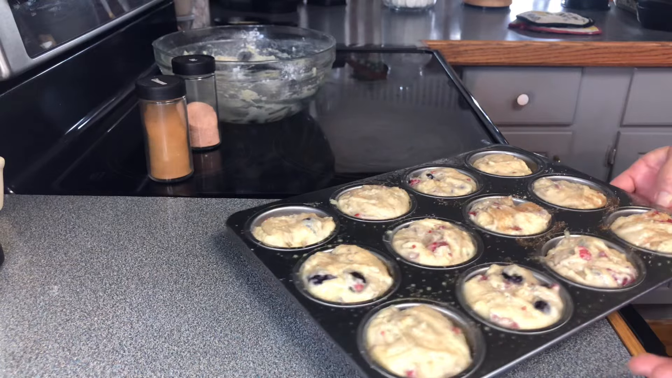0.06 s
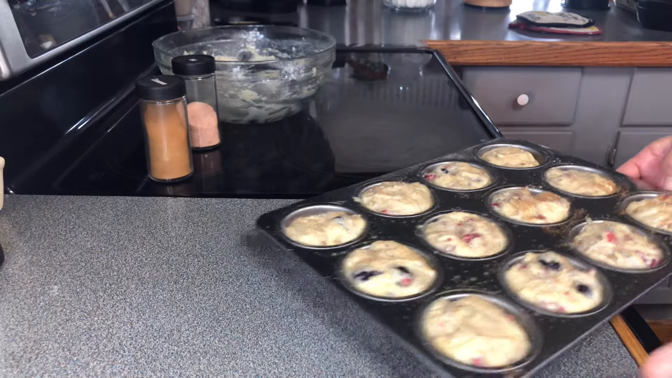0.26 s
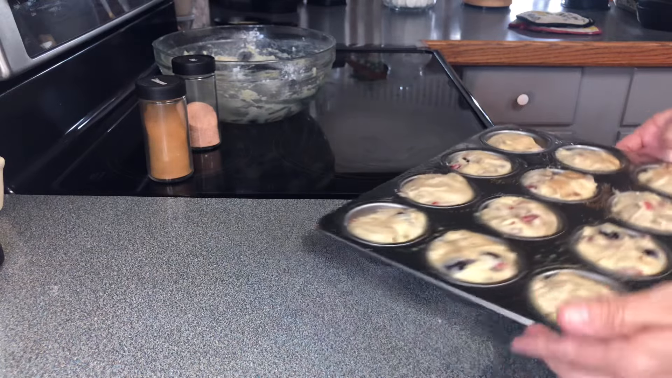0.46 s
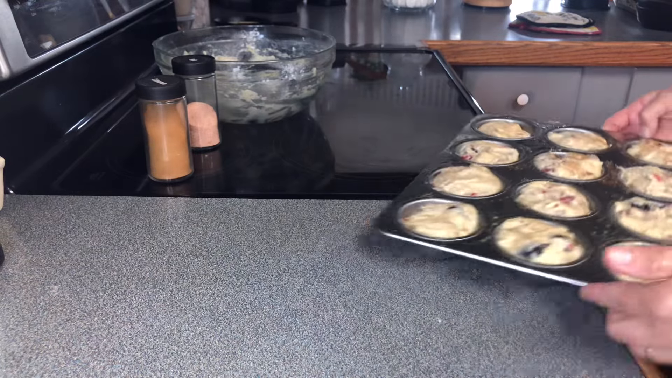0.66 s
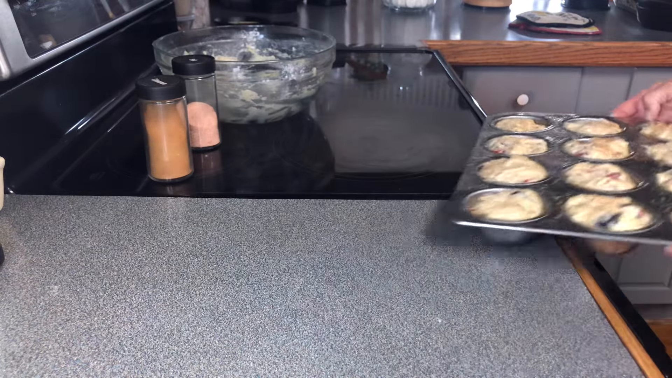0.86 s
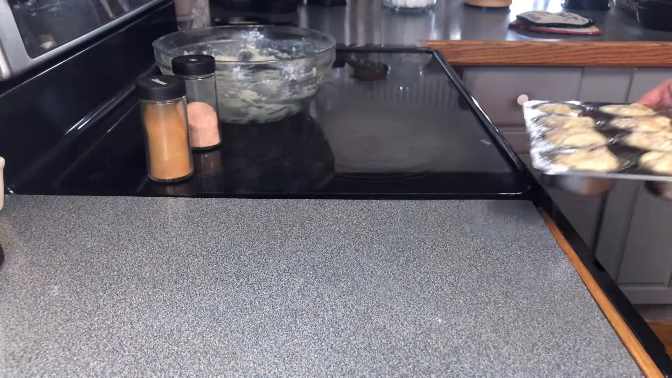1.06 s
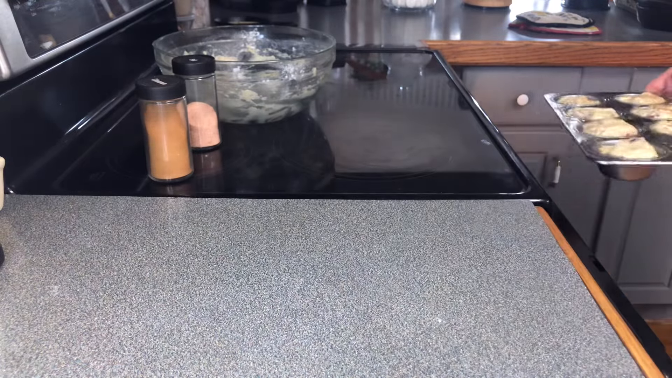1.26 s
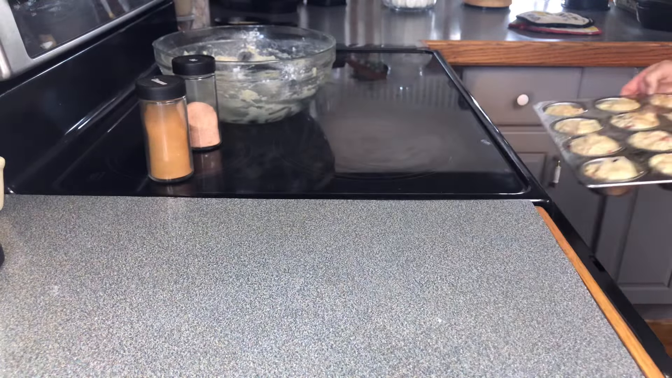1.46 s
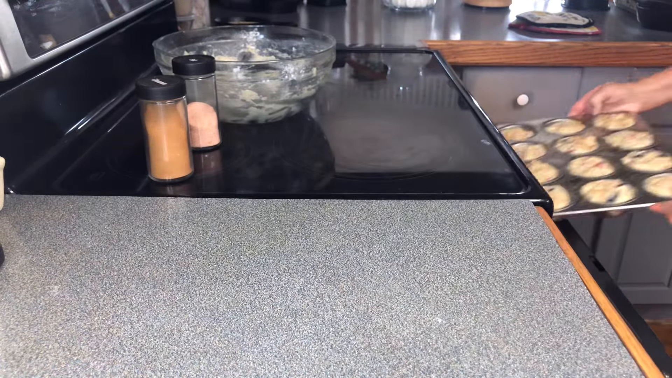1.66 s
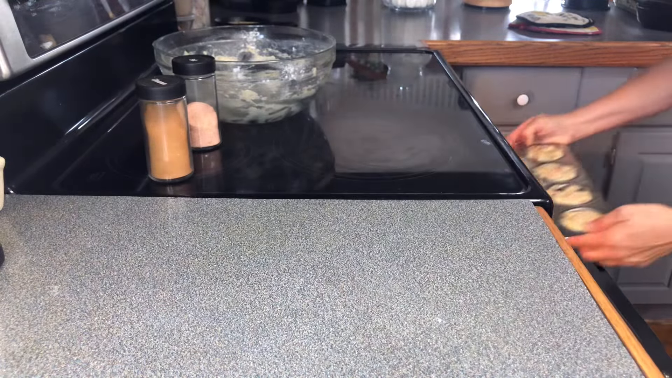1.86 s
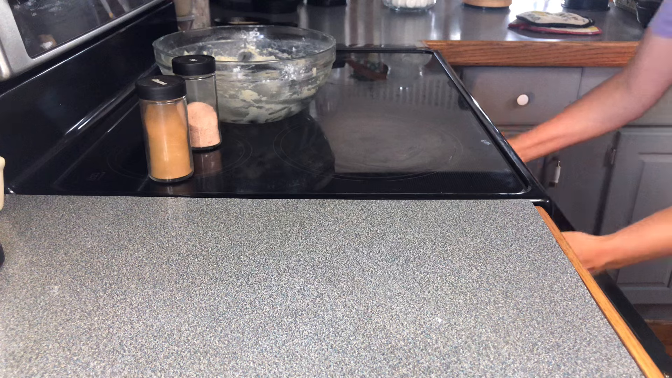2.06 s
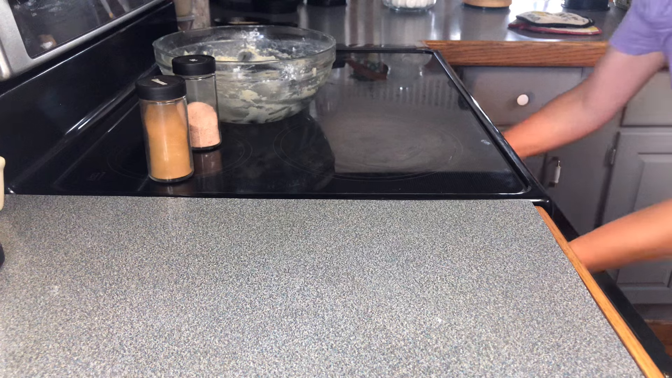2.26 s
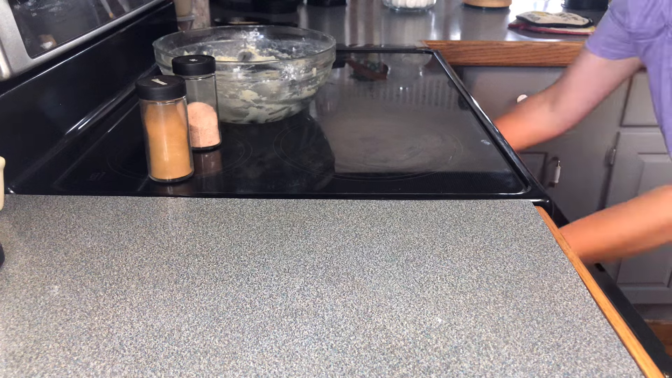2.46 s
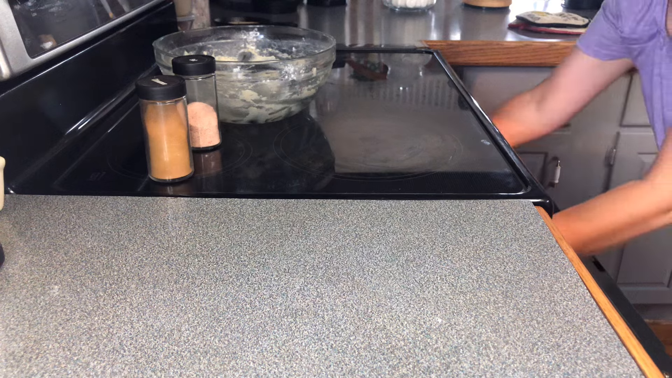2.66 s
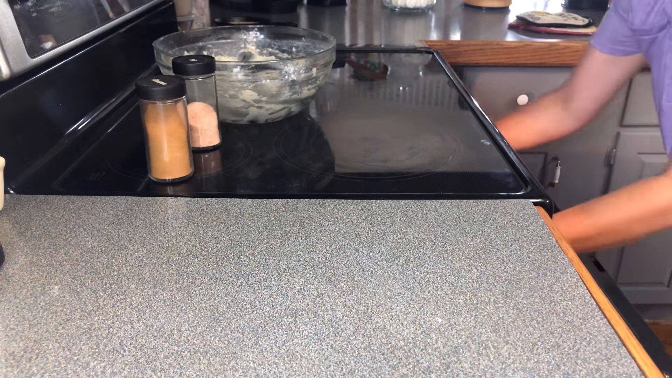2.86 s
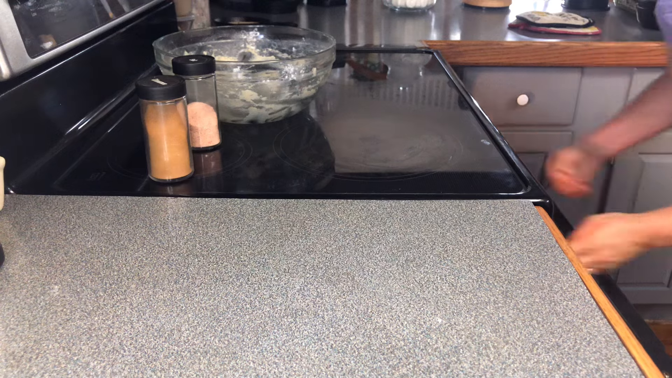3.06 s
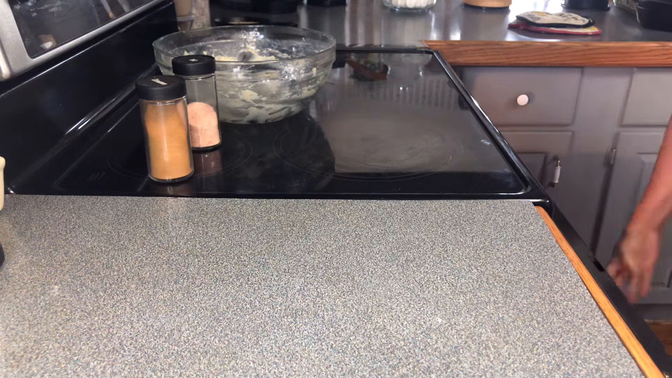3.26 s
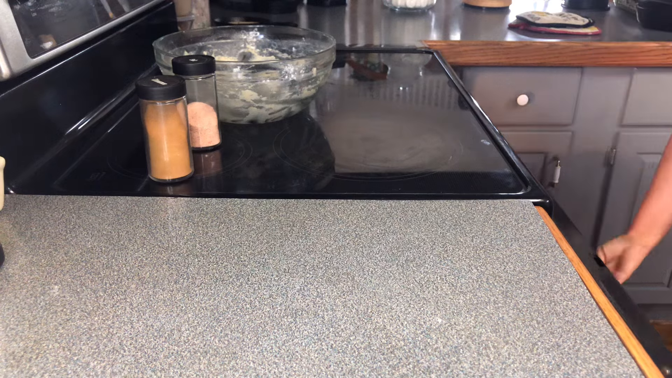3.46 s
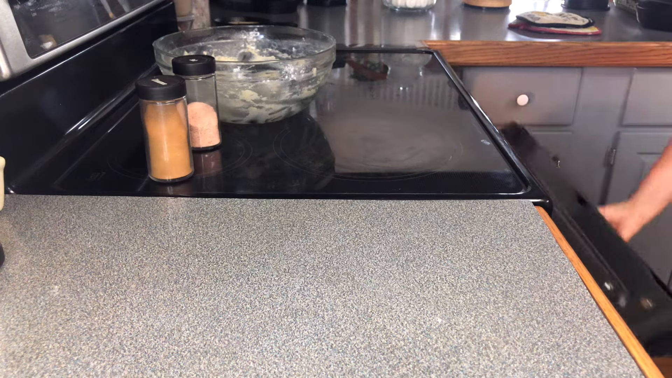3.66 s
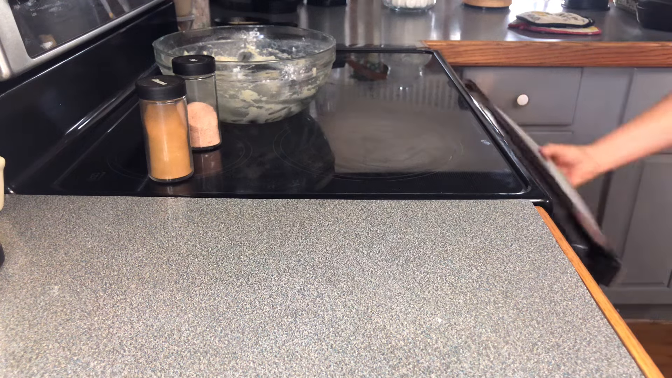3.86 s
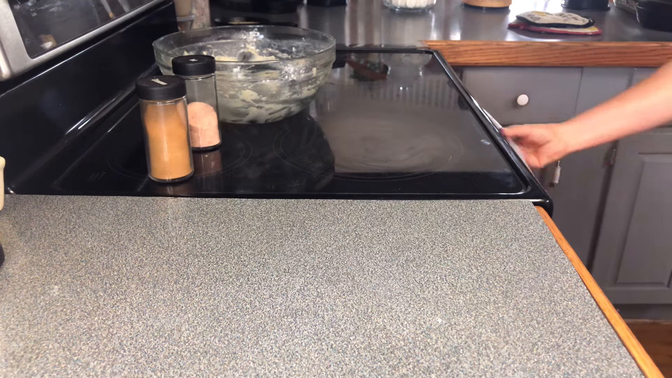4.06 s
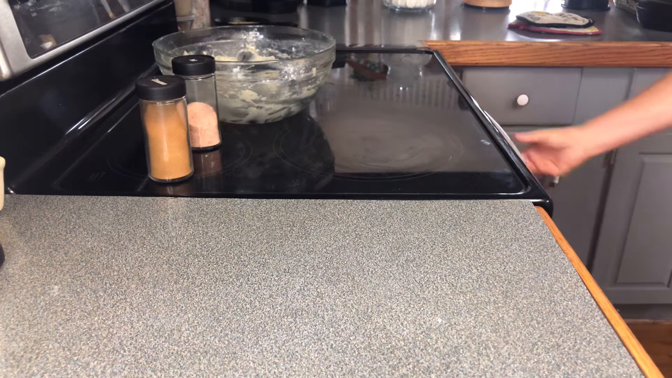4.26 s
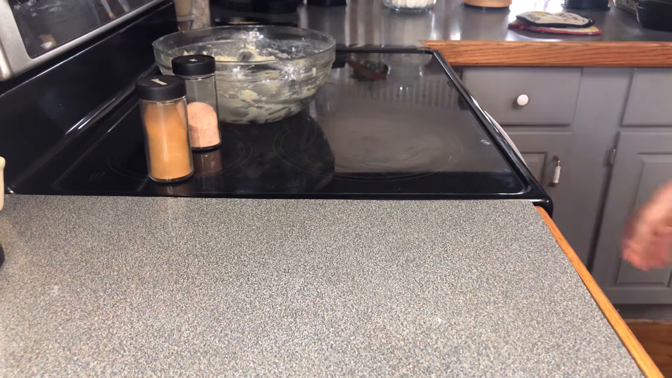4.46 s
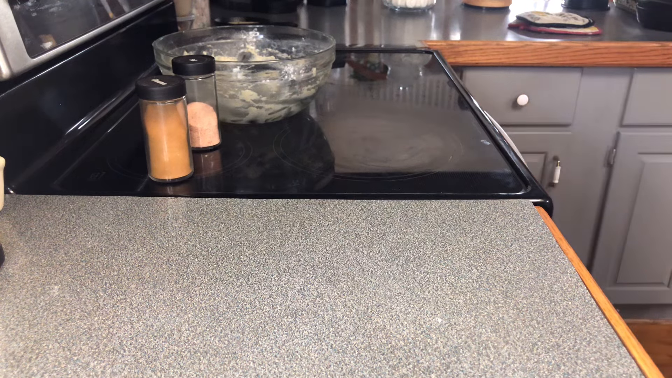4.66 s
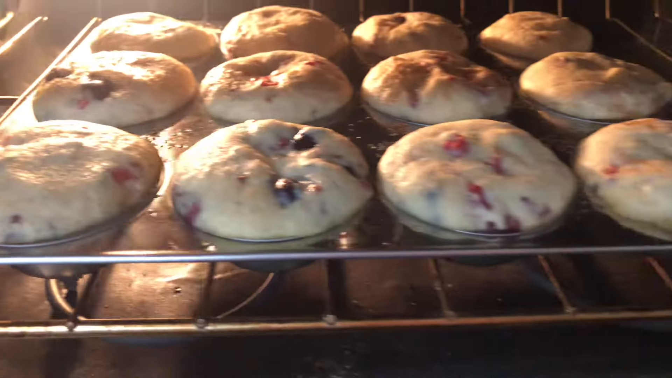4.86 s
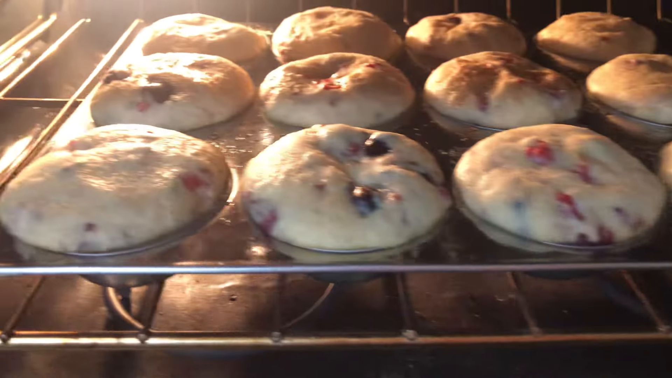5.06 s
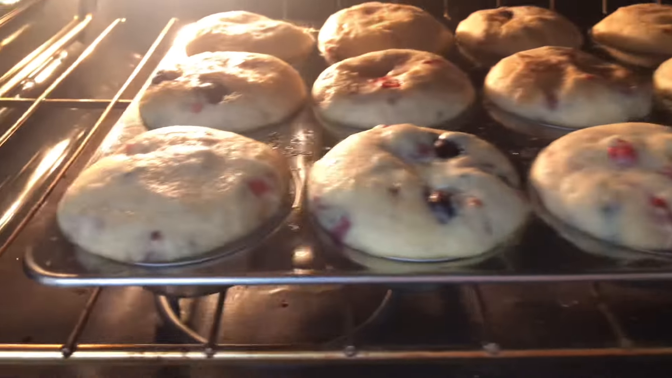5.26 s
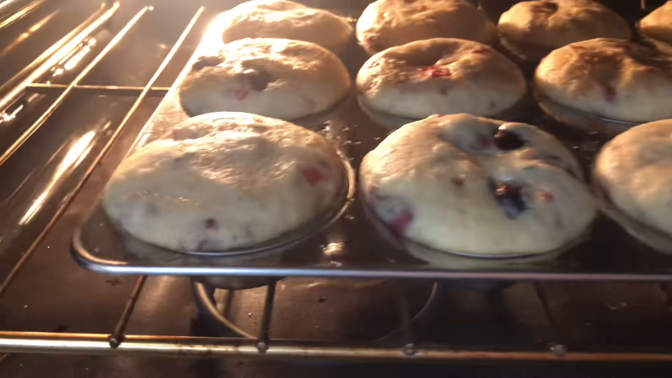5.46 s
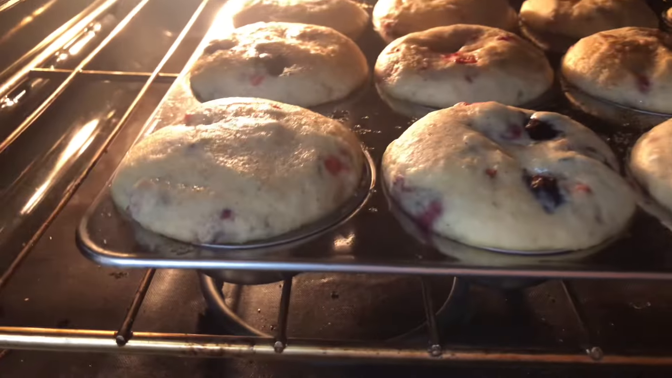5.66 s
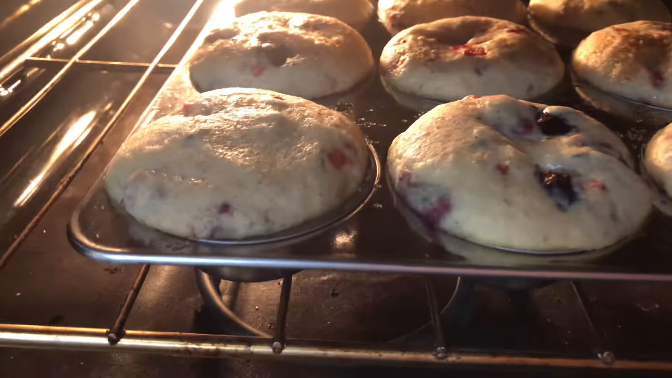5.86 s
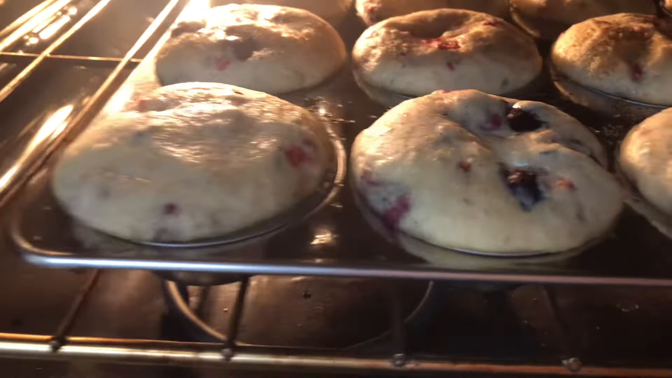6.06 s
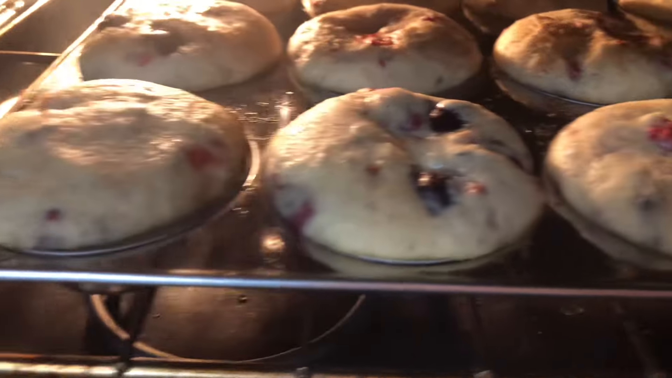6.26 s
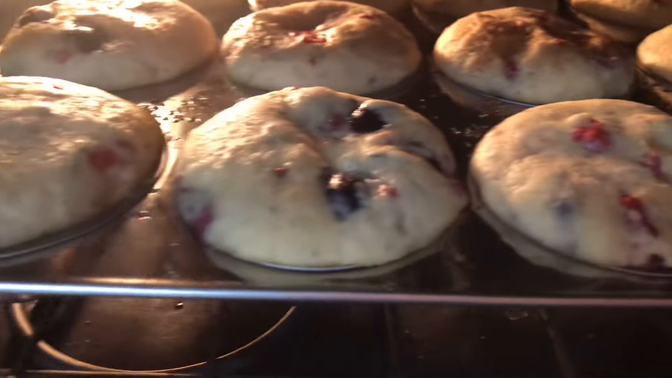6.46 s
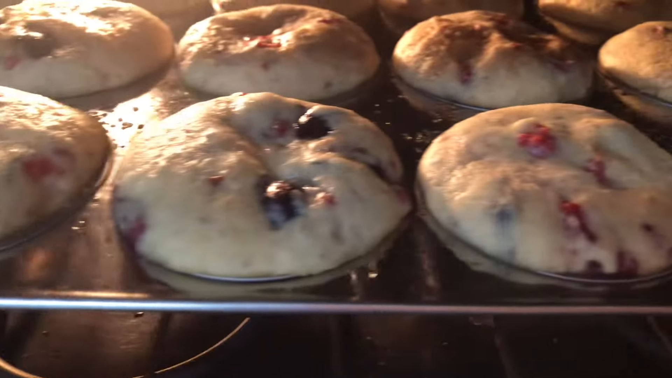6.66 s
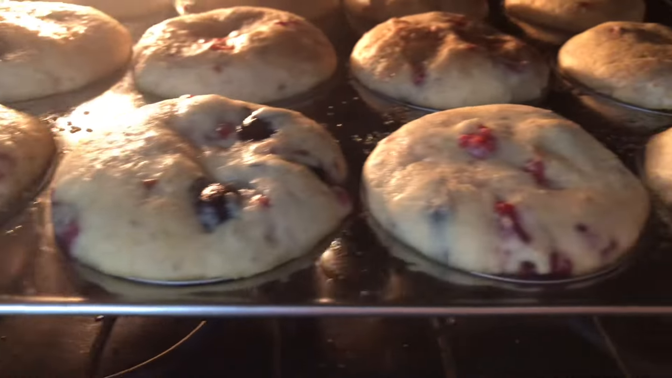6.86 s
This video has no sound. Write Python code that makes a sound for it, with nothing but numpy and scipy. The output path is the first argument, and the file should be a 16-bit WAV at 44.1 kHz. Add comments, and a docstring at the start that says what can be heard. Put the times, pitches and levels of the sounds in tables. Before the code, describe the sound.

A quiet kitchen with low airy hum, heard by a small nearby microphone. From 0 s a full metal muffin tin drags over a textured counter, its scrape gritty and hollow, growing until about 0.5 s with small catches and judders, then easing. At 0.83 s its edge gives a sharp bright knock as it lifts off. From 1.1 to 2 s clothing brushes very softly. At 2.16 s the tin lands on a wire oven rack and slides with a loud clanging chatter, hitting again at 2.44 s; a small tap follows at 2.64 s while wires ring thinly. A dull faint bump comes at 3.37 s. At 3.86 s the door hinge clacks hard; around 4.07-4.2 s the door rattles home with a low thump and a tick. Fabric rustles near 4.65 s. At 4.87 s the background switches abruptly to a close, low oven hum with sparse faint spits until the end.

```python
"""A full muffin tin is dragged off a kitchen counter, knocks its edge and is slid, chattering, onto a wire
oven rack; the oven door clacks on its hinge and shuts with a rattle and a thump. Clothing brushes softly.
Then, close to the hot oven, it hums and the baking muffins tick faintly.
Contacts are forces of noise grains and bursts convolved with the modal answers of metal bodies;
cloth and air are coloured noise, and the hums are wavering sines."""
import sys
import numpy as np
from scipy import signal
from scipy.io import wavfile

SR = 44100
rng = np.random.default_rng(int(sys.argv[2]) if len(sys.argv) > 2 else 0)


def to_wav(s):
    """Save 16-bit WAV."""
    ch = np.atleast_2d(s).T  # columns
    pcm = np.round(np.clip(ch, -1, 1) * 32767)  # PCM
    wavfile.write(sys.argv[1], SR, pcm.astype(np.int16))


N = 304751
T = np.arange(N) / SR
RING_T = T[:2 * SR]
AT_OVEN_S = 4.87
CUTOFF_HZ = 15900

# In all tables dB is a relative level, before a body or a mix weighs it, unless a comment says otherwise.
# Skids where the cups bite harder. Each row: start in seconds, level in dB, hold in seconds, release in dB per s.
CUP_SKIDS = [(0.078, -47, 0.018, 300), (0.398, -44, 0.013, 600), (0.446, -42.5, 0.016, 500),
             (0.75, -50, 0.015, 400)]
# Catches on grit. Each row: start in seconds, level in dB, decay time of the rebounds in seconds,
# contact softness as a cut-off in Hz.
CATCHES_ON_GRIT = [(0.002, -48, 0.014, 14000), (0.083, -32.5, 0.0018, 15400), (0.482, -42, 0.013, 14000),
                   (0.51, -46, 0.03, 5000), (0.602, -45, 0.0063, 12000), (0.634, -46, 0.024, 14000),
                   (0.688, -45, 0.012, 14000)]
# Knocks of the tin. Each row: start in seconds, level in dB, rebound decay in seconds, softness cut-off in Hz.
EDGE_KNOCKS = [(0.001, -45, 0.0048, 2000), (0.8316, -4, 0.000083, 12000), (0.8392, -31.5, 0.0034, 9000),
               (0.876, -42.5, 0.022, 15000)]
# Clear modes of the tin. Each row: frequency in Hz, level in dB (of its energy), t60 in seconds.
TIN_MODES = [(148, -4, 0.3), (210, -10, 0.11), (355, -13.5, 0.1), (580.7, 1, 0.37), (744, 0, 0.89),
             (760, -4.5, 0.29), (1107, -10.5, 0.35), (1362, -20, 0.1), (1720, -1.5, 0.14),
             (1825, -21, 0.25), (2036, -10, 0.057), (2196, -13, 0.18), (2360, -4, 0.027), (2570, -44, 0.19)]
# Decay of the tin's crowded modes. Each row: frequency in Hz, t60 in seconds.
TIN_WASH_DECAY = [(150, 0.21), (700, 0.37), (2500, 0.39), (12000, 0.31)]
# Spectrum of the rubbing cups. Each row: frequency in Hz, density in dB per Hz.
RUBBING_SPECTRUM = [(120, -10.5), (210, 1), (300, -12.5), (420, -3), (600, 2), (1100, 0), (1450, -7.5),
                    (1750, -1.5), (2400, -7.5), (3600, -12.5), (6000, -22), (9000, -44), (15000, -42)]
# Spectrum of scratching grit. Each row: frequency in Hz, density in dB per Hz.
GRIT_SPECTRUM = [(700, 12.5), (1500, 5), (3500, 7.5), (6000, 2.5), (8500, -1), (11000, -2), (15500, -4.5)]
# Spectrum of the knocks. Each row: frequency in Hz, density in dB per Hz.
KNOCK_SPECTRUM = [(140, -0.5), (190, -2), (360, -12.5), (620, 2.5), (850, -3), (1120, -11), (1400, -5.5),
                  (1750, -7.5), (2350, -6), (3300, -14), (5000, -23), (7700, -26), (11000, -36),
                  (15500, -39)]


def tin_on_counter():
    """Friction noise: the cups rub over the textured counter, catch on grit and knock its edge."""
    rub = pull(peak_s=0.468, peak_db=-39.0, build_db_per_s=26, drop_db=8.5, fade_db_per_s=4)
    rub = rub + sum(chatter(*skid) for skid in CUP_SKIDS)
    hiss = pull(peak_s=0.535, peak_db=-47.0, build_db_per_s=22, drop_db=7.5, fade_db_per_s=26)
    scuffs = amp(1.5 * drift(130))  # the cups grip and slip unevenly
    rubbing = sliding(rub * scuffs * grains(2000, 2.6), shifts_per_s=13.83,
                      colour=RUBBING_SPECTRUM, decay=TIN_WASH_DECAY, modes=TIN_MODES,
                      crack_t60=0.034, tail_db=-5, modes_db=-6, snap=0.97)
    grit = hiss * scuffs * grains(6000, 2.3) + blows(CATCHES_ON_GRIT, first_touch=0.35)
    scratching = play(grit, metal(GRIT_SPECTRUM, TIN_WASH_DECAY, TIN_MODES,
                                  crack_t60=0.026, tail_db=4, modes_db=-14.5, snap=1.8))
    knocks = play(blows(EDGE_KNOCKS, first_touch=2.5),
                  metal(KNOCK_SPECTRUM, TIN_WASH_DECAY, TIN_MODES,
                        crack_t60=0.018, tail_db=-1.5, modes_db=-26, snap=0.49))
    return amp(-4) * rubbing + scratching + knocks


# Judders where the cups stick. Each row: start in seconds, level in dB, rebound decay in seconds,
# softness cut-off in Hz.
STICKING_JUDDERS = [(0.462, -38.5, 0.03, 2000), (0.6, -42, 0.021, 1000), (0.624, -37.5, 0.014, 1000),
                    (0.777, -49.5, 0.035, 1500), (2.442, -30, 0.02, 2000)]
# Modes of the cups. Each row: frequency in Hz, level in dB (of its energy), t60 in seconds.
CUP_MODES = [(340, -4.5, 0.13), (396, -8.5, .15), (462, -7, 0.055), (505, -4.5, 0.14), (594, -7, 0.24)]
# Dull bumps that flex the tin. Each row: start in seconds, level in dB, contact time in seconds.
FLEXING_BUMPS = [(0.008, -40, 0.003), (0.39, -35.5, 0.0014), (0.625, -39, 0.0019), (0.835, -27.5, 0.0029),
                 (2.17, -28, 0.0016), (2.27, -28.5, 0.0019), (2.305, -30, 0.0014), (3.368, -37.5, 0.0036)]


def tin_flexing():
    """Modal excitation: the cups judder where they stick, and the whole sheet flexes when bumped."""
    judders = play(blows(STICKING_JUDDERS, first_touch=0.29), ringing(CUP_MODES))
    return amp(-10.5) * judders + bumps(FLEXING_BUMPS, TIN_MODES)


# Shoves along the wires. Each row: start in seconds, level in dB, hold in seconds, release in dB per s.
RACK_SHOVES = [(2.166, -30.5, 0.016, 300), (2.216, -29.8, 0.1, 700), (2.43, -48.5, 0.07, 170)]
# Hits on the rack. Each row: start in seconds, level in dB, rebound decay in seconds, softness cut-off in Hz.
HITS_ON_RACK = [(2.1605, -32, .005, 15100), (2.171, -29.5, 0.0086, 9000), (2.226, -28, .016, 14000),
                (2.26, -18, 0.012, 14400), (2.4405, -27, 0.02, 6660), (2.637, -47, 0.022, 2160)]
# Clear modes of the rack. Each row: frequency in Hz, level in dB (of its energy), t60 in seconds.
RACK_MODES = [(190, 4.5, 0.85), (238, -0.5, 0.9), (275, -10.5, 0.96), (498, -28, 0.41), (930, 4, 0.59),
              (1054, -9, 0.93), (1060, -7, 1), (1152, -8.5, .5), (1344, -6.5, 1), (1667, 3.5, .6),
              (1890, 3, .4), (2320, -8, 0.23), (2420, -10, 0.39), (2780, -15, .4), (2870, -8, 0.69),
              (3668, -7, 0.37), (3890, -13.5, 0.13), (4000, -25, .4)]
# Decay of the rack's crowded modes. Each row: frequency in Hz, t60 in seconds.
RACK_WASH_DECAY = [(150, 1), (600, 0.91), (2000, 0.54), (5000, .42), (12000, 0.33)]
# Spectrum of tin against rack. Each row: frequency in Hz, density in dB per Hz.
RACK_SPECTRUM = [(125, -5.5), (160, 1.5), (240, -2.5), (350, -16), (560, -9), (750, -10.5), (950, -6),
                 (1400, -10.5), (2400, -9.5), (4000, -14.5), (5500, -17.5), (8000, -21), (11500, -28),
                 (15500, -33)]


def tin_on_rack():
    """Coupled bodies: the tin lands, judders along the wires and hits the stop; rack and tin ring on."""
    push = sum(chatter(*shove) for shove in RACK_SHOVES)
    force = push * grains(700, 4.2) + blows(HITS_ON_RACK, first_touch=0.41)
    return sliding(force, shifts_per_s=25,
                   colour=RACK_SPECTRUM, decay=RACK_WASH_DECAY, modes=RACK_MODES + TIN_MODES,
                   crack_t60=0.035, tail_db=5, modes_db=-9)


# Plucks of the rack wires. Each row: start in seconds, level in dB.
PLUCKS = [(2.441, -47), (2.637, -49)]
# Modes of the wires. Each row: frequency in Hz, level in dB (of its amplitude), t60 in seconds.
WIRE_MODES = [(302, -4, 2.6), (316, -7, 2.26), (337, -7, 3), (383, -3, 0.92), (717.7, -7, 2.6),
              (883, -12.5, 1.8), (1320, -19, 1.8), (1730, -10, .9), (1760, -13, 2.8), (1763.5, -15, 2.8),
              (1784, -15, 2), (2300, -16, 0.92), (2950, -11, 1)]


def wires():
    """Beating: once the tin settles, the free rack wires sing on, some in close pairs."""
    force = np.zeros(N)
    for s, db in PLUCKS:
        force[round(s * SR)] = amp(db)
    answer = 0
    for hz, db, t60 in WIRE_MODES:
        phase = rng.uniform(0, 2 * np.pi)
        answer = answer + amp(db) * dying(t60) * np.sin(2 * np.pi * hz * RING_T + phase)
    return amp(-4.0) * play(force, answer)


# Clacks of the hinge. Each row: start in seconds, level in dB, rebound decay in seconds, softness cut-off in Hz.
CLACKS = [(3.8545, -28.5, 0.003, 15000), (3.859, -22, 0.0042, 14000)]
# Hits of the closing door. Each row: start in seconds, level in dB, rebound decay in seconds,
# softness cut-off in Hz.
CLOSING_HITS = [(4.072, -36, 0.013, 14000), (4.079, -33, 0.019, 8000), (4.117, -37, 0.012, 3500)]
# Ticks of the small latch. Each row: start in seconds, level in dB, rebound decay in seconds,
# softness cut-off in Hz.
SMALL_LATCH_TICKS = [(4.186, -32.5, 0.012, 15000)]
# Rattle of the door's panels. Its one row: start in seconds, level in dB, hold in seconds, release in dB per s.
RATTLE_OF_PANELS = (4.102, -40.5, 0.03, 98)
# Door against the oven shell. Each row: start in seconds, level in dB, contact time in seconds.
THUMPS_ON_SHELL = [(3.866, -42, .002), (4.106, -26.5, 0.0035)]
# Clear modes of the door. Each row: frequency in Hz, level in dB (of its energy), t60 in seconds.
DOOR_MODES = [(114, -11, 0.67), (413, -17, 0.13), (420, -3.5, 0.2), (467, -8, .2), (613, -2, 0.28),
              (730, -1.5, 0.4), (1292, -5.5, 0.21), (1647, -5, 0.4), (2710, -10, 0.17), (3210, -2.5, 0.12),
              (3190, -3, 0.24), (4387, -2.5, 0.047), (4550, -10, 0.069)]
# Low modes of the shell. Each row: frequency in Hz, level in dB (of its energy), t60 in seconds.
SHELL_MODES = [(40.5, -12, .12), (55, 2, 0.54), (83.4, -3.5, 0.11), (117.6, 2.5, 0.23), (168.4, 1.5, 0.27),
               (195.5, -7, 0.36)]
# Decay of the door's crowded modes. Each row: frequency in Hz, t60 in seconds.
DOOR_WASH_DECAY = [(150, 0.27), (700, 0.47), (2500, 0.4), (6000, 0.42), (12000, 0.24)]
# Spectrum of the hinge. Each row: frequency in Hz, density in dB per Hz.
HINGE_SPECTRUM = [(110, -0.5), (190, -1.5), (290, -6), (420, 6), (590, -8), (800, -5), (1100, -11.5),
                  (1600, -7), (2100, -13), (3300, -7.5), (4700, -12), (6000, -18.5), (10000, -19.5),
                  (15500, -26)]
# Spectrum of the door. Each row: frequency in Hz, density in dB per Hz.
DOOR_SPECTRUM = [(130, -5.5), (210, -5), (320, -15.5), (480, -5), (650, -11.5), (900, -16), (1450, -15),
                 (2100, -16), (3700, -23.5), (5200, -21.5), (9000, -26), (15500, -27.5)]


def oven_door():
    """Impact: the hinge snaps over its catch, then the door rattles home and thumps the shell."""
    hinge = sliding(blows(CLACKS, first_touch=0.5), shifts_per_s=150,
                    colour=HINGE_SPECTRUM, decay=DOOR_WASH_DECAY, modes=DOOR_MODES,
                    crack_t60=0.033, tail_db=0, modes_db=-11, snap=0.2)
    panels = soften(chatter(*RATTLE_OF_PANELS) * grains(900, 3.0), soft_hz=2700)
    small_latch = signal.butter(2, 7000, "high", fs=SR, output="sos")  # it rings only in the highs
    latch = signal.sosfilt(small_latch, blows(SMALL_LATCH_TICKS, first_touch=0.24))
    hits = blows(CLOSING_HITS, first_touch=0.24)
    rattle = sliding(hits + panels + latch, shifts_per_s=30,
                     colour=DOOR_SPECTRUM, decay=DOOR_WASH_DECAY, modes=DOOR_MODES,
                     crack_t60=0.022, tail_db=7, modes_db=-11, snap=0.46)
    return hinge + rattle + bumps(THUMPS_ON_SHELL, SHELL_MODES)


# Spits of batter on the hot tin. Each row: start in seconds, level in dB, centre of its band in Hz.
BATTER_SPITS = [(4.9526, -55, 2560), (5.6211, -57, 3570), (5.684, -48, 8660), (5.8251, -53, 2030),
                (6.1778, -55, 2820), (6.3978, -60, 2540), (6.7585, -54, 3680), (6.8303, -51, 13200)]
# Spectrum of the sizzle. Each row: frequency in Hz, density in dB per Hz.
SPIT_SPECTRUM = [(1500, -4), (4000, -4.5), (9000, -3), (15000, -4)]
SPIT_WIDTH = 1.6  # ratio of spread either side of the pitch


def sizzle():
    """Impulse noise: a few clear spits, each with a broad pitch, over a sparse fine crackle."""
    force = amp(-89) * grains(70, 3.1) * (T > AT_OVEN_S)
    for s, db, hz in BATTER_SPITS:
        edges = [hz / SPIT_WIDTH, min(hz * SPIT_WIDTH, CUTOFF_HZ)]
        band = signal.butter(1, edges, "band", fs=SR, output="sos")
        pop = unit(signal.sosfilt(band, signal.unit_impulse(256)))
        start = round(s * SR)
        force[start:start + len(pop)] += amp(db) * pop
    answer = banded(SPIT_SPECTRUM, len(RING_T), lambda hz: dying(0.012), snap=0.34)
    return play(force, amp(7.5) * answer)


# Brushes as the cook turns and bends. Each row: time of the peak in seconds, level in dB, rise in seconds,
# extra treble in dB.
CLOTH_BRUSHES = [(1.158, -63.5, 0.019, -2), (1.352, -69, 0.014, -4), (1.392, -69, 0.013, -5),
                 (1.462, -65.5, 0.03, -4), (1.59, -66.5, 0.034, 4.5), (1.738, -58, 0.038, 2),
                 (1.84, -66, 0.045, -1), (2.0, -73, 0.13, 1.5), (3.7, -70.5, 0.11, 0),
                 (4.65, -66.5, 0.04, -0.5), (4.8, -71.5, 0.05, 1)]
# Spectrum of the fabric. Each row: frequency in Hz, density in dB per Hz.
CLOTH_SPECTRUM = [(600, -6), (1500, 0.5), (4000, -3), (8000, -8.5), (15000, -13)]


def clothes():
    """Fibre friction: fabric brushes softly, each stroke a smooth swell of its own brightness."""
    fabric = amp(1.0 * drift(54)) * banded(CLOTH_SPECTRUM, N) * np.sqrt(N)
    body = signal.sosfilt(signal.butter(3, 5500, "low", fs=SR, output="sos"), fabric)
    treble = signal.sosfilt(signal.butter(3, 5500, "high", fs=SR, output="sos"), fabric)
    body_power = treble_power = 0
    for s, db, rise, treble_db in CLOTH_BRUSHES:
        width = np.where(T < s, rise, rise * 1.5)  # a brush dies more slowly than it rises
        swell = np.exp(-((T - s) / width) ** 2)
        body_power += amp(db) ** 2 * swell
        treble_power += amp(db + treble_db) ** 2 * swell
    return body * np.sqrt(body_power) + treble * np.sqrt(treble_power)


# Air in the kitchen. Each row: frequency in Hz, density in dB per Hz.
KITCHEN_AIR_SPECTRUM = [(15, -44.5), (25, -9), (129, 0.5), (240, -12), (322, -10.5), (378, -11), (614, -18),
                        (722, -12), (1200, -22), (1710, -23), (2010, -28.5), (4620, -32.5), (11800, -41.5),
                        (15500, -42)]
# Hum in the kitchen. Each row: frequency in Hz, level in dB rms.
KITCHEN_HUM_TONES = [(70, -64.5), (119.8, -62), (144, -71)]
# Air at the oven. Each row: frequency in Hz, density in dB per Hz.
OVEN_AIR_SPECTRUM = [(15, -51), (25, -7), (48, -16.5), (82, -2), (144, -1), (173, -14.5), (240, -8.5),
                     (322, -11), (598, -17), (684, -15.5), (1050, -21), (1490, -27.5), (3260, -34.5),
                     (15500, -41.5)]
# Hum at the oven. Each row: frequency in Hz, level in dB rms.
OVEN_HUM_TONES = [(58, -65), (141, -65.5), (242, -71), (292, -80)]


def background():
    """Crossfade: the kitchen's air and hum give way within 8 ms to those by the hot oven."""
    at_oven = np.clip((T - AT_OVEN_S) / 0.0079, 0, 1)
    kitchen = ambience(KITCHEN_AIR_SPECTRUM, -59.0, KITCHEN_HUM_TONES, waver=0.99)
    oven = ambience(OVEN_AIR_SPECTRUM, -60.5, OVEN_HUM_TONES, waver=1.0)
    return (1 - at_oven) * kitchen + at_oven * oven


def ambience(colour, air_db, hum, waver):
    """Broadband noise and phase modulation: rushing air and a wavering hum."""
    tones = 0
    for hz, db in hum:
        phase = 2 * np.pi * hz * T + waver * drift(6)
        tones = tones + amp(db) * np.sqrt(2) * np.sin(phase)
    return amp(air_db) * banded(colour, N) * np.sqrt(N) + tones


def pull(peak_s, peak_db, build_db_per_s, drop_db, fade_db_per_s):
    """Friction follows load: a drag builds to the counter's edge, drops as hands take the weight, and fades."""
    past = T - peak_s
    level = np.where(past < 0, build_db_per_s * past, -drop_db - fade_db_per_s * past)
    creep = 7 * (T < 0.08)  # before it breaks free the tin only creeps, 7 dB more quietly
    return amp(peak_db + level - creep) * (T <= 0.83)  # ends at lift-off


def chatter(s, db, hold_s, release_db_per_s):
    """Envelope of a bout of chatter: quick attack, hold, steady release in dB."""
    attack = np.clip((T - s) / 0.01, 0, 1)
    return attack * amp(db - release_db_per_s * np.maximum(T - s - hold_s, 0))


def grains(per_s, spread_db):
    """Random impulse train: tiny contacts of uneven size at random moments; rms one."""
    sizes = amp(spread_db * np.minimum(rng.exponential(1, N), 4)) * rng.choice([-1, 1], N)
    return unit(sizes * (rng.random(N) < per_s / SR)) * np.sqrt(N)


def blows(rows, first_touch):
    """Rebound: each blow is one touch with a dying flurry of small rebounds."""
    force = np.zeros(N)
    for s, db, length, soft_hz in rows:
        fade = np.exp(-T[:SR // 2] / max(length, 1e-4))
        flurry = unit(rng.standard_normal(len(fade)) ** 3 * fade)
        flurry[0] += first_touch
        flurry = unit(soften(flurry, soft_hz)) * np.linalg.norm(fade)  # longer blows carry more energy
        start = max(0, round(s * SR))
        force[start:start + len(fade)] += amp(db) * flurry
    return force


def bumps(rows, modes):
    """Finite contact time: soft half-sine pushes swing a body's low modes."""
    force, answer = np.zeros(N), ringing(modes)
    for s, db, contact in rows:
        push = np.sin(np.pi * np.clip((T - s) / contact, 0, 1))
        force += amp(db) * push / push.sum()
    return play(force, answer / np.abs(answer).max()) * 2


def soften(force, soft_hz):
    """Contact compliance: a one-pole low-pass dulls a force and keeps its energy."""
    pole = np.exp(-2 * np.pi * soft_hz / SR)
    return unit(signal.lfilter([1], [1, -pole], force)) * np.linalg.norm(force)


def sliding(force, shifts_per_s, **body):
    """Mode shapes: a moving contact wanders between two spots, each with its own mix of crowded modes."""
    place = np.pi / 2 * drift(shifts_per_s)
    return play(force * np.cos(place), metal(**body)) + play(force * np.sin(place), metal(**body))


def play(force, answer):
    """Linear response: a force convolved with the impulse answer of a body."""
    return signal.fftconvolve(force, answer)[:N]


def metal(colour, decay, modes, crack_t60, tail_db, modes_db, snap=0):
    """Modal density: a metal body answers with a crack, a wash of crowded modes and a few clear ones."""
    def crack_and_wash(hz):
        return unit(dying(crack_t60)) + amp(tail_db) * unit(dying(at_hz(decay, hz)))

    crowded = banded(colour, len(RING_T), crack_and_wash, snap)
    return unit(crowded + amp(modes_db) * ringing(modes))


def ringing(modes):
    """Modal superposition: damped sines of alternating sign, their energies set by the dB column."""
    total = 0
    for k, (hz, db, t60) in enumerate(modes):
        mode = unit(dying(t60) * np.sin(2 * np.pi * hz * RING_T))
        total = total + (-1) ** k * amp(db) * mode
    return unit(total)


def banded(colour, size, envelope=lambda hz: 1, snap=0):
    """Subband synthesis: enveloped noise in third-octave bands led by a snap, highs first; energy one."""
    edges, out = np.geomspace(22, 17500, 30), 0
    white = rng.standard_normal((2, size))  # neighbouring bands take turns with two noises
    for k, (low, high) in enumerate(zip(edges, edges[1:])):
        hz = np.sqrt(low * high)
        drive = unit(white[k % 2] * envelope(hz)) + 1e-18
        drive[0] += snap * (-1) ** k
        band = signal.sosfilt(signal.butter(2, [low, high], "band", fs=SR, output="sos"), drive)
        skirt = min(1, hz / colour[0][0]) ** 2  # roll-off below the first point of the spectrum
        out = out + unit(band) * amp(at_hz(colour, hz)) * skirt * np.sqrt(high - low)
    return unit(out)


def dying(t60):
    """Damping: exponential decay by 60 dB in t60."""
    return np.exp(-np.log(1000) * RING_T / max(t60, 1e-3))


def drift(per_s):
    """Random fluctuation: straight lines between normal random knots of spread one."""
    knots = rng.standard_normal(4000)
    return np.interp(T * per_s, np.arange(len(knots)), knots)


def at_hz(points, hz):
    """Interpolation of a table on a log-frequency axis."""
    f, value = np.transpose(points)
    return np.interp(np.log(hz), np.log(f), value)


def amp(db):
    """Level to gain: decibels to an amplitude ratio."""
    return 10 ** (np.asarray(db) / 20)


def unit(x):
    """Normalisation to an energy of one."""
    return x / np.sqrt(np.sum(x ** 2) + 1e-30)


def scene():
    """Superposition: the tin, rack, door, sizzle and clothes over the background."""
    tin = tin_on_counter() + tin_flexing() + tin_on_rack()
    oven = wires() + oven_door() + sizzle()
    return (tin + oven + clothes() + background())[None]


def record(dry):
    """Band limiting: the small microphone drops the deepest bass; the top is cut steeply."""
    thin = signal.sosfilt(signal.butter(4, 32, "high", fs=SR, output="sos"), dry)
    return signal.sosfilt(signal.ellip(10, 0.1, 70, CUTOFF_HZ, fs=SR, output="sos"), thin)


dry = scene()
out = record(dry)
to_wav(out)
```